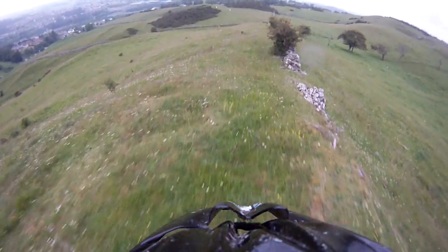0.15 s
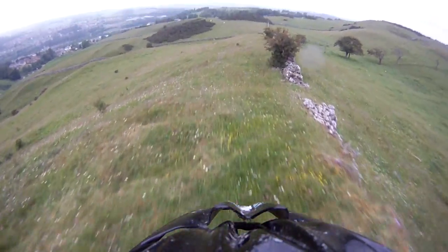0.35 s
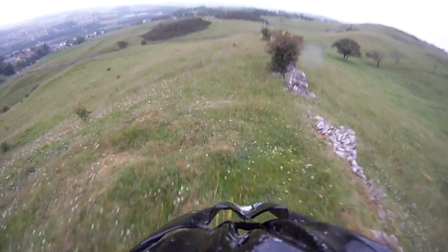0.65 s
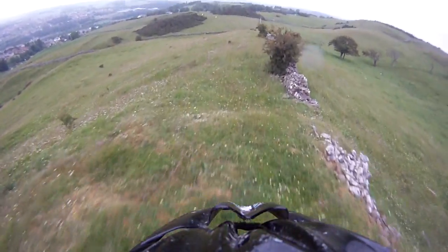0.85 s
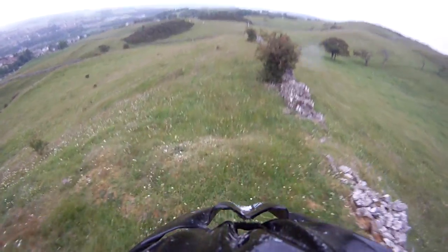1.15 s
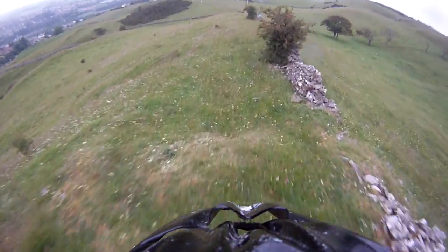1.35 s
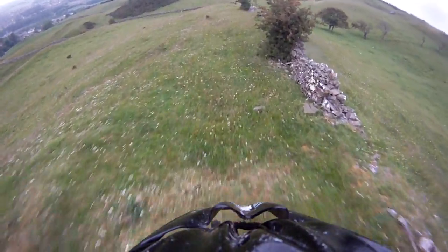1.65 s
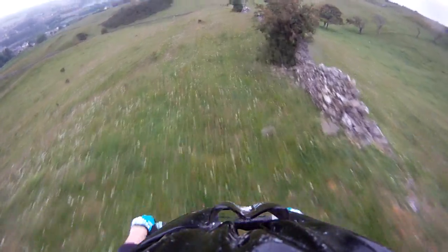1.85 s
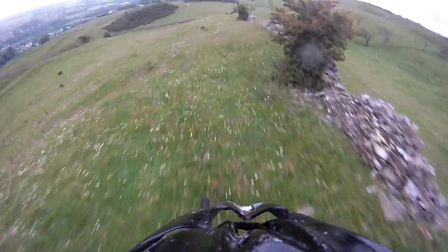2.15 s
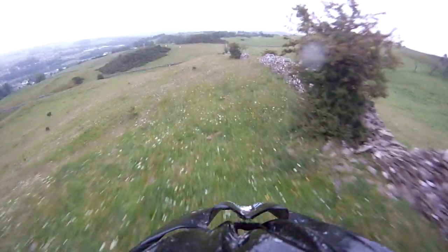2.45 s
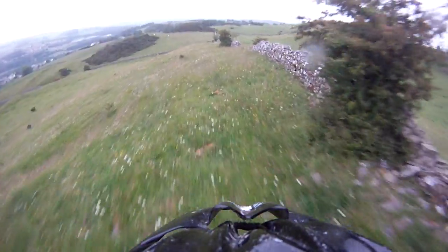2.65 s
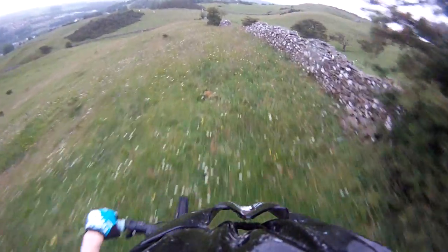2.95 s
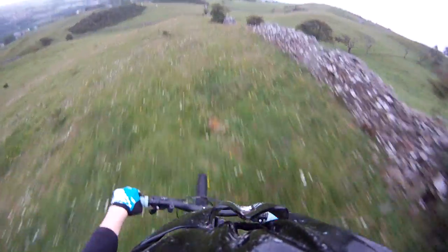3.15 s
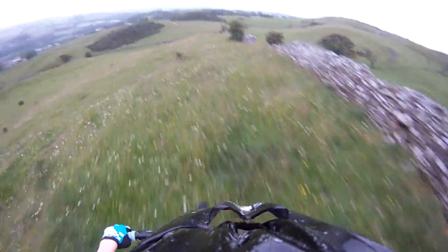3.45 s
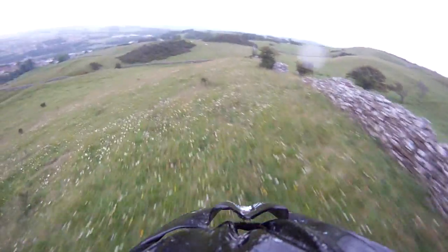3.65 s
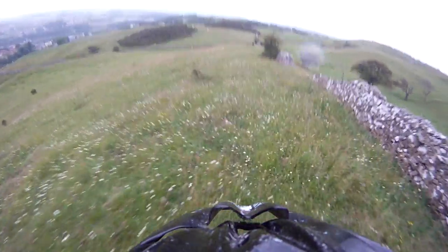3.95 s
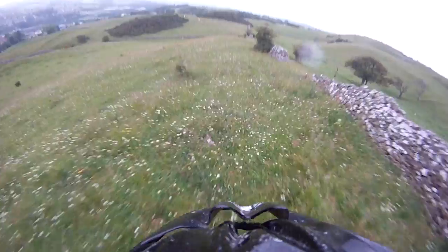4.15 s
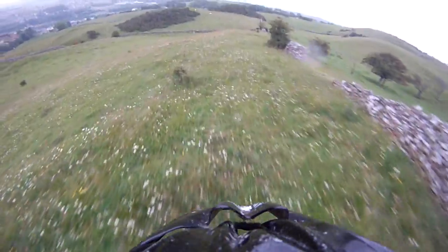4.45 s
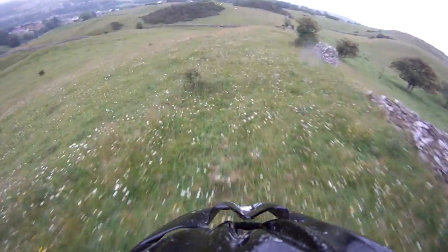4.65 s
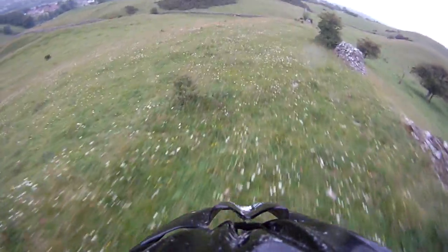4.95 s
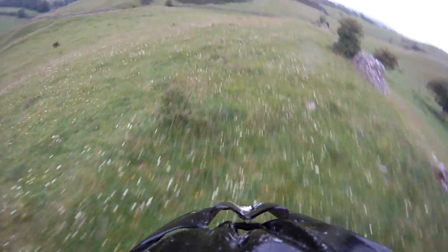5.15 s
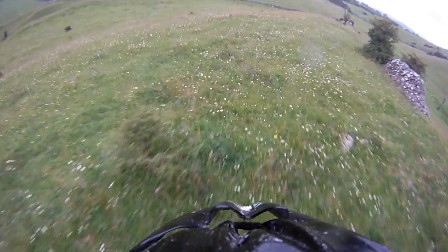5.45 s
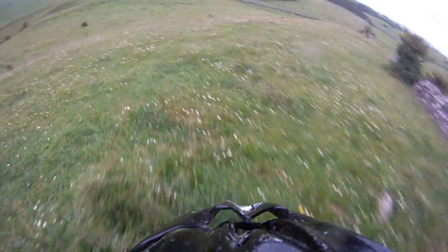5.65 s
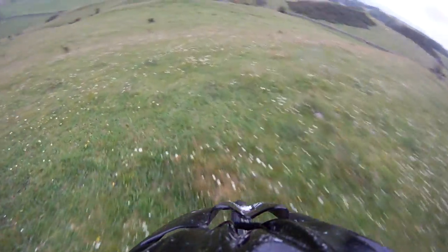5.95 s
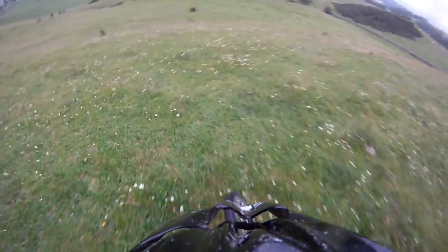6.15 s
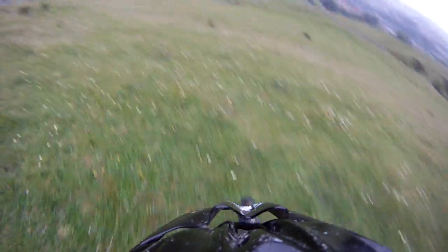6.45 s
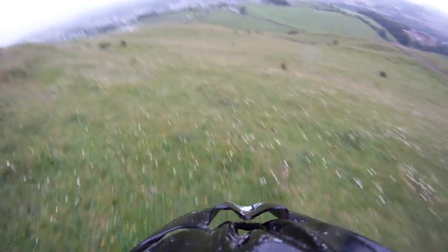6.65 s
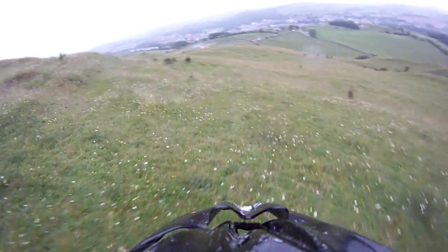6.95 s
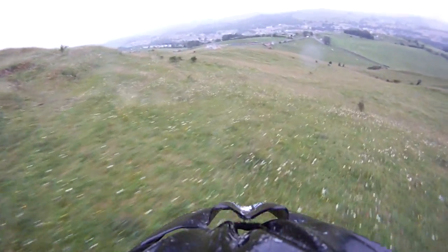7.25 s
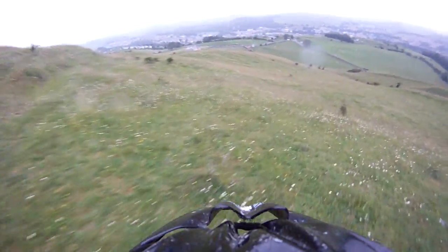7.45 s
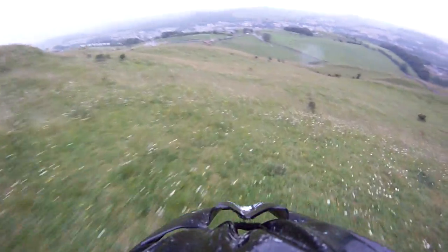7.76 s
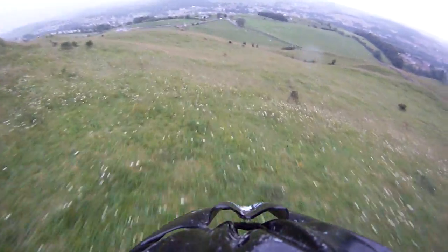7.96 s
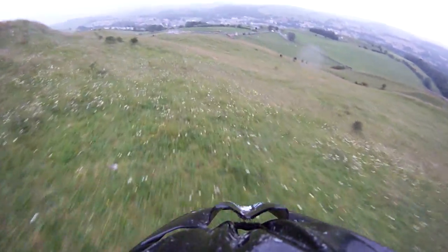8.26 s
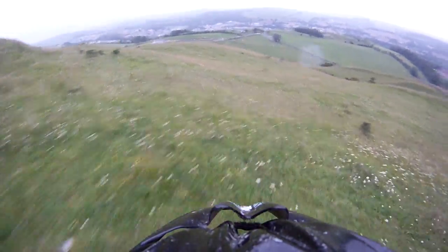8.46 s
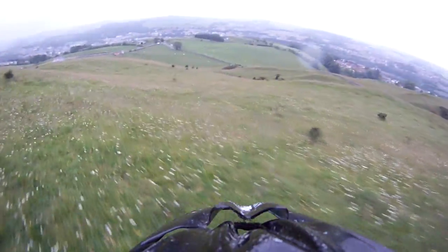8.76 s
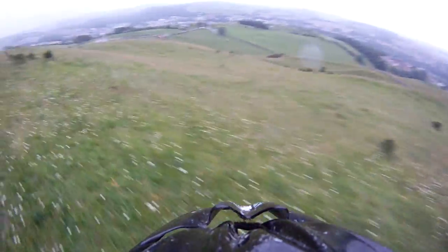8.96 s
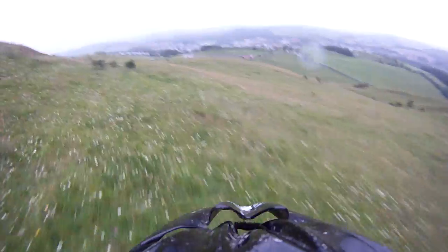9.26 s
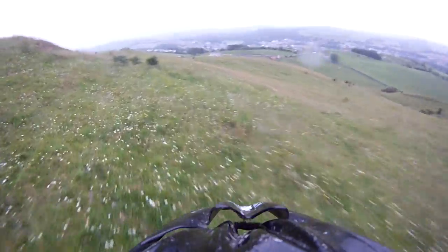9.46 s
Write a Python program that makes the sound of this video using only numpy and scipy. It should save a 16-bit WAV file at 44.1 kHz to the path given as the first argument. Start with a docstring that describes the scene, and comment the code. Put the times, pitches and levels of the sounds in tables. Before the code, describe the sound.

A mountain bike rides down a grassy hillside, heard from a closed camera case on the rider's helmet. Hollow, boxy wind and the swish of grass against tyres and spokes run throughout, over a low rumble and buffeting. Around 2 seconds the wheels thump into hollows and the rush grows, with a sharp plastic knock at 2.5. A metal clink and two more bumps come just after 3 seconds, then a tyre scuff. From about 4 to 6 seconds the wind and grass are loudest, and the loose camera mount clacks in a rapid, irregular run. Near 6.5 seconds the bike jolts with a few thuds and short scuffs, and the wind falls away. Light ticks and chain clinks rattle from about 6.7 to 8 seconds. The rolling stays soft, with another cluster of plastic knocks around 9 to 9.4 seconds.

```python
"""A mountain bike runs down a grassy hillside, heard from a camera in a closed case on the rider's helmet.
Wind and grass rush through the case's resonances; stalks brush the spokes, tyres rumble and scuff.
Bumps rock the helmet, chain and spokes clink, grit ticks on the frame and the loose mount knocks.
The camera holds each sample at a low rate, which mirrors the sound into the treble."""
import sys
import numpy as np
from scipy import signal
from scipy.fft import rfft, irfft
from scipy.io import wavfile

SR = 44100
rng = np.random.default_rng(int(sys.argv[2]) if len(sys.argv) > 2 else 0)


def dump(signal):
    """Clip the signal to [-1, 1] and save it as 16-bit WAV at the path in sys.argv[1]."""
    limited = np.clip(np.atleast_2d(signal).T, -1, 1)
    pcm = np.round(limited * 32767).astype(np.int16)
    wavfile.write(sys.argv[1], SR, pcm)


N = 423801
TIME = np.arange(N) / SR
RING_TIME = TIME[:SR // 5]


def undb(db):
    return 10 ** (np.asarray(db) / 20)


def noise(spectrum):
    """Unit-rms noise shaped by (freq_hz, density_db) points."""
    hz, db = np.transpose(spectrum)
    f = np.arange(N // 2 + 1) * SR / N + 1
    gain = undb(np.interp(np.log(f), np.log(hz), db)) * np.minimum(f / hz[0], 1) ** 2
    shaped = irfft(rfft(rng.standard_normal(N)) * gain, N)
    return shaped / shaped.std()


def walk(rate_hz):
    """Random drift, spread near 1."""
    knots = np.arange(0, N / SR + 1, 1 / rate_hz)
    return 1.28 * np.interp(TIME, knots, rng.standard_normal(len(knots)))


def add(track, start_s, sound):
    i = int(np.clip(start_s * SR, 0, N - 1))
    track[i:i + len(sound)] += sound[:N - i]


def excerpt(track, start_s):
    return track[int(start_s * SR):][:len(RING_TIME)]


def ring(hz, t60_s, phase=0):
    """One struck mode."""
    return np.sin(2 * np.pi * hz * RING_TIME + phase) * np.exp(-np.log(1000) * RING_TIME / t60_s)


# air heard through the case: freq_hz, density_db
AIR_SPECTRUM = [(78, -0.5), (125, -14), (160, -12.5), (200, -21.5), (340, -21.5), (410, -16.5),
                (500, -21.5), (620, -17.5), (730, -0.5), (820, -7), (980, 2.5), (1300, -15), (2500, -20),
                (5000, -54.5)]

def air(wind_db, trim_db=1, gust_db=0.5):
    """Air flutters over the case."""
    return noise(AIR_SPECTRUM) * undb(wind_db + trim_db + gust_db * walk(18))


# grass heard through the case: freq_hz, density_db
GRASS_SPECTRUM = [(700, -30), (1150, 0.5), (1480, 0), (1800, -0.5), (2150, 2), (2400, -1), (2750, -3),
                  (3050, -10), (3500, -11.5), (4200, -19), (5100, -16.5), (5600, -20)]

def grass(swish_db, tuft_db=1.3, blade_db=2.0):
    """Grass passes the tyres in tufts and single blades."""
    return noise(GRASS_SPECTRUM) * undb(swish_db + tuft_db * walk(30) + blade_db * walk(700))


def spokes(swish_db, grass_depth, whirr_hz=2720, flutter_db=2, long_db=-4, short_db=-16):
    """Stalks brush the spokes: a narrow, fluttering band, strongest in long grass."""
    shape = [(0.74, -30), (0.89, -8), (1, 0), (1.04, -4), (1.19, -22), (2, -45)]
    band = noise([(ratio * whirr_hz, db) for ratio, db in shape])
    depth_db = short_db + (long_db - short_db) * grass_depth
    return band * undb(swish_db + depth_db + flutter_db * walk(20))


# tyre rumble through frame and rider: freq_hz, density_db
TYRE_SPECTRUM = [(105, -4), (142, 1.5), (158, 5), (178, -3), (330, -6), (420, -8), (650, -10.5),
                 (1500, -28.5)]

def tyres(wind_db, grass_depth, offset_db=-50, wind_slope=0.23, tussock_db=3):
    """Rolling rumble grows slowly with speed, and over deep grass."""
    level_db = offset_db + wind_slope * wind_db + tussock_db * grass_depth
    return noise(TYRE_SPECTRUM) * undb(level_db + walk(10))


# helmet buffeting: freq_hz, density_db
BUFFET_SPECTRUM = [(12, 0), (25, 3), (42, -1), (55, 8), (66, -5.5), (78, 1), (100, -14), (150, -38.5)]

def buffeting(eddy_db):
    """Eddies rock the helmet on its padding."""
    return noise(BUFFET_SPECTRUM) * undb(eddy_db + walk(5.5))


# wheels drop into hollows: peak_s, level_db
WHEEL_DROPS = [(.125, -36), (1.97, -18), (2.2, -28), (2.308, -33), (2.377, -25), (3.172, -25.5),
               (3.422, -23), (4.33, -32), (6.412, -27), (6.467, -24), (6.506, -18.5)]

def bumps(sway_hz=55.3, rise_s=0.018, decay_s=0.07, sway_share=0.61, heave_share=0.41, heave_s=0.016):
    """Each bump heaves the helmet and leaves it swaying."""
    out = np.zeros(N)
    t = TIME[:SR // 2] - 0.1
    sway = np.cos(2 * np.pi * sway_hz * t) * np.exp(-np.maximum(-t / rise_s, t / decay_s))
    u = (t / heave_s) ** 2
    heave = (1 - u) * np.exp(-u / 2)
    for peak_s, db in WHEEL_DROPS:
        add(out, peak_s + t[0], -undb(db) * (sway_share * sway + heave_share * heave))
    return out


# tyres scuff through tufts: peak_s, level_db, sigma_s, grass_share
TYRE_SCUFFS = [(0.758, -45.5, 0.02, 0.98), (1.1, -41.5, .08, 0.45), (2.75, -39.5, .08, 0.83),
               (3.68, -34, 0.047, .6), (6.403, -28, 0.0037, 0.39), (6.464, -38, 0.0043, 0.27),
               (6.476, -28, .006, .05)]

def scuffs():
    """Short swells: a hollow rush where tyres bite earth, a swish where they tear grass."""
    out = np.zeros(N)
    earth, swish = noise(AIR_SPECTRUM), noise(GRASS_SPECTRUM)
    for peak_s, db, sigma_s, grass_share in TYRE_SCUFFS:
        swell = np.exp(-0.5 * ((TIME - peak_s) / sigma_s) ** 2)
        out += undb(db) * swell * ((1 - grass_share) * earth + grass_share * swish)
    return out


# dry snap of a hard, short contact: freq_hz, density_db
SNAP_SPECTRUM = [(1200, -8), (2200, 3.5), (4500, -3), (5800, 0.5), (7000, -21)]
# hits on the frame: start_s, level_db
FRAME_TICKS = [(1.644, -38), (6.701, -32), (6.774, -38), (6.867, -39), (7.348, -35.5), (7.438, -33),
               (7.66, -33), (7.881, -34)]

def ticks(trim_db=-1, decay_s=0.001):
    """Stalks and grit tick on the frame."""
    out = np.zeros(N)
    snap = noise(SNAP_SPECTRUM)
    for start_s, db in FRAME_TICKS:
        add(out, start_s, undb(db + trim_db) * excerpt(snap, start_s) * np.exp(-RING_TIME / decay_s))
    return out


# chain and spoke strikes: start_s, level_db, pitch_hz, t60_s
METAL_CLINKS = [(1.644, -46, 5100, 0.04), (1.775, -40, 4510, 0.056), (2.314, -36, 5230, 0.072),
                (3.075, -29, 2053, 0.053), (6.516, -35.5, 2980, .03), (6.702, -38, 3000, 0.025),
                (7.246, -36, 2320, 0.053), (7.366, -30, 2000, 0.065), (7.491, -39.5, 4484, 0.064),
                (7.615, -39, 1910, 0.028), (7.619, -45, 3450, 0.044), (7.922, -37.5, 2430, .03),
                (8, -33, 2020, 0.023)]

def clinks(scrape, trim_db=-0.5, scrape_gain=0.2, neighbour_gain=0.22, rise_s=0.0019,
           overtone_ratio=1.15, overtone_db=-11):
    """Struck metal rings and scrapes; five neighbouring links strike just after."""
    out = np.zeros(N)
    attack = 1 - np.exp(-RING_TIME / rise_s)
    for start_s, db, hz, t60_s in METAL_CLINKS:
        gain = undb(db + trim_db)
        jangle = scrape_gain * excerpt(scrape, start_s) * np.exp(-np.log(1000) * RING_TIME / t60_s)
        tone = ring(hz, t60_s) + undb(overtone_db) * ring(hz * overtone_ratio, t60_s)
        add(out, start_s, gain * (tone + jangle) * attack)
        for late, detune in rng.random((5, 2)):
            neighbour = ring(hz * (0.65 + 0.5 * detune), t60_s / 2)
            add(out, start_s + 0.012 * late, neighbour_gain * gain * neighbour)
    return out


# camera case modes: freq_hz, level_db, t60_s
CASE_MODES = [(717, -38, 0.12), (982, -13.5, 0.024), (1528, -3, .013), (1768, -4, 0.013), (2050, -1, 0.015),
              (2540, -10, 0.017), (2980, -23, 0.027), (3210, -29, 0.0073), (3710, -4.5, 0.01),
              (4052, -5, 0.012), (4750, -36, 0.01), (5000, -15.5, 0.0084)]

def case_ring(rise_s=0.00033, highpass_hz=850):
    """The struck shell takes a moment to build; small and stiff, it radiates no bass."""
    modes = sum(undb(db) * ring(hz, t60_s, np.pi / 2) for hz, db, t60_s in CASE_MODES)
    attack = 1 - np.exp(-RING_TIME / rise_s)
    return signal.sosfilt(signal.butter(3, highpass_hz, "high", fs=SR, output="sos"), modes * attack)


# mount knocks against its play: start_s, level_db, bounce_share
MOUNT_KNOCKS = [(2.5185, -10.5, 0), (3.8903, -9.5, 0.71), (3.9259, -16, 1), (4.1212, -15, 0.28),
                (4.1454, -13, 0.94), (4.1958, -13, 0.26), (4.2505, -5, 0.38), (4.2961, -13, 0.0),
                (4.388, -11.5, 0.38), (4.5142, -10, 0.076), (4.74, -9, 0.13), (4.8334, -14.5, 0.33),
                (4.8911, -15.5, 0.5), (5.0013, -17.5, 0.0), (5.23, -13, 0.7), (5.2813, -14.5, 0.61),
                (5.5435, -13, 0.49), (5.6313, -13, 0.16), (5.6645, -18.5, 0.33), (5.7818, -15.5, 0),
                (8.927, -18, 0.66), (9.1333, -20, 0.5), (9.1781, -27, 0.027), (9.1967, -25.5, 0.0),
                (9.3055, -14, 0.52), (9.3627, -16, 0.037)]

def mount(wind_db, touch_share=0.34, play_s=0.00204, bounce_s=0.0098, contact_s=0.00005,
          harden_per_db=0.02, rough_s=(3.88, 5.85), chatter_over_wind_db=14.5,
          ring_db=-0.74, snap_db=-21, snap_s=0.0013):
    """The mount touches, crosses its play and hits home, ringing the case; rough ground adds chatter."""
    chatter = []
    for start_s in rng.uniform(*rough_s, size=14):
        db = np.interp(start_s, TIME, wind_db) + chatter_over_wind_db + 3 * rng.standard_normal()
        chatter.append((start_s, db, 0.4))
    blows = np.zeros(N)
    t = TIME[:64]
    for start_s, db, bounce_share in list(MOUNT_KNOCKS) + chatter:
        # faster riding: shorter contact, brighter knock
        excess_db = np.interp(start_s, TIME, wind_db) - wind_db.mean()
        push_s = contact_s * np.exp(-harden_per_db * excess_db)
        push = t * np.exp(-t / push_s)
        push = undb(db) * push / push.sum()
        for hit_s, share in ((start_s, 1), (start_s + bounce_s, bounce_share)):
            add(blows, hit_s - play_s * rng.uniform(0.85, 1.196), touch_share * share * push)
            add(blows, hit_s, share * push)
    shell = signal.fftconvolve(blows, case_ring())[:N]
    # plastic faces snap together
    snap = noise(SNAP_SPECTRUM) * signal.fftconvolve(blows, np.exp(-RING_TIME / snap_s))[:N]
    return undb(ring_db) * shell + undb(snap_db) * snap


def slack_chain(scrape, span_s=(7.35, 8.05), level_db=-52, fade_db=-5, scatter_db=3,
                lowest_hz=1700, tone_gain=0.7, rise_s=0.0035):
    """Loose links clatter softly, each with its own pitch, and settle."""
    out = np.zeros(N)
    envelope = RING_TIME / rise_s * np.exp(1 - RING_TIME / rise_s)
    for progress, octaves, force in rng.random((36, 3)):
        start_s = np.interp(progress, (0, 1), span_s)
        tone = tone_gain * np.sin(2 * np.pi * lowest_hz * 2 ** octaves * RING_TIME)
        gain = undb(level_db + fade_db * progress + scatter_db * (2 * force - 1))
        add(out, start_s, gain * (excerpt(scrape, start_s) + tone) * envelope)
    return out


# wind level, following riding speed: time_s, level_db
RIDE_WIND = [(0.0, -46.5), (1.48, -45), (1.76, -49), (2.12, -40.5), (2.8, -40.5), (2.88, -42), (3.2, -45.5),
             (3.92, -35), (4.04, -37.5), (4.24, -34), (4.32, -36), (5.68, -39.5), (6.8, -51), (7.08, -59.5),
             (7.44, -55.0), (7.52, -58.0), (7.92, -53.5), (8.48, -57), (9.2, -54.0), (9.6, -59.5)]

def scene(cruise_db=-44, long_grass_s=(0, 0.6, 3.9, 6.2)):
    """Speed drives wind, grass, tyres and eddies; rough ground adds bumps, knocks and rattles."""
    wind_db = np.interp(TIME, *np.transpose(RIDE_WIND))
    grass_depth = np.interp(TIME, long_grass_s, [0, 1, 1, 0])
    swish_db = -45 + 1.17 * (wind_db - cruise_db)
    eddy_db = -45.5 + 0.25 * (wind_db - cruise_db)
    rush = air(wind_db) + grass(swish_db) + spokes(swish_db, grass_depth)
    rumble = tyres(wind_db, grass_depth) + buffeting(eddy_db)
    jolts = bumps() + scuffs() + mount(wind_db)
    metal_scrape = noise([(900, -16), (2000, 20), (3500, -4), (5200, -3), (6000, 10), (8000, -40)])
    rattles = ticks() + clinks(metal_scrape) + slack_chain(metal_scrape)
    return (rush + rumble + jolts + rattles)[None]


def record(dry, band_hz=5450, sample_hz=12000, repeats=4, top_hz=15400):
    """The camera samples at a low rate and holds each value, then cuts the top."""
    narrow = signal.sosfilt(signal.butter(16, band_hz, fs=SR, output="sos"), dry)
    sampled = signal.resample_poly(narrow, sample_hz, SR, axis=1)
    held = np.repeat(sampled, repeats, axis=1)
    mirrored = signal.resample_poly(held, SR, repeats * sample_hz, axis=1)[:, :N]
    return signal.sosfilt(signal.ellip(8, 0.2, 70, top_hz, fs=SR, output="sos"), mirrored)


dry = scene()
out = record(dry)
dump(out)
```